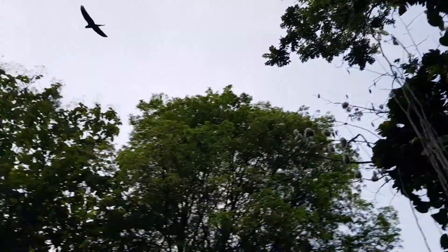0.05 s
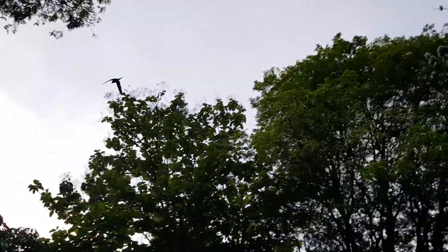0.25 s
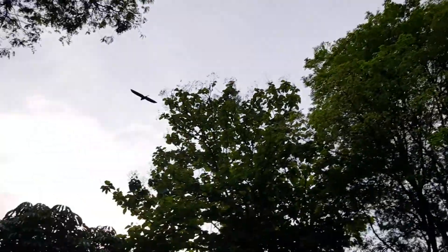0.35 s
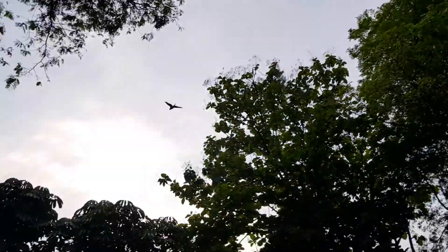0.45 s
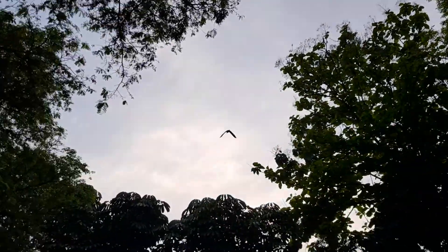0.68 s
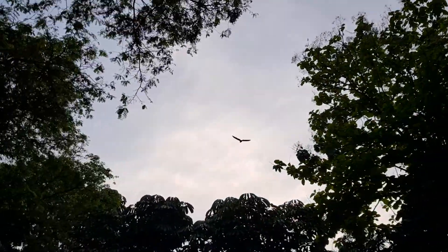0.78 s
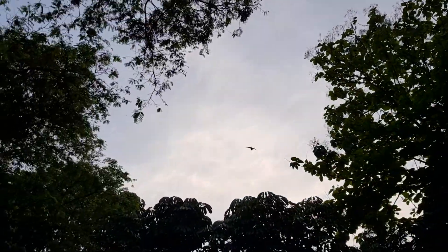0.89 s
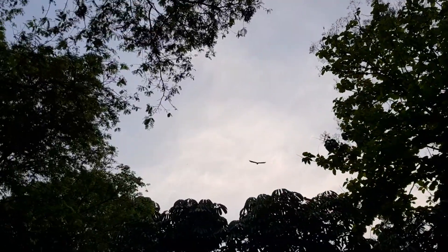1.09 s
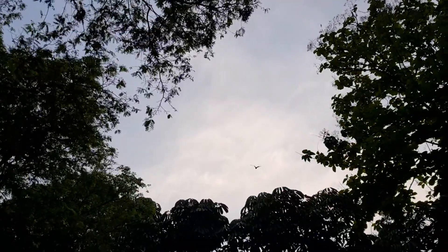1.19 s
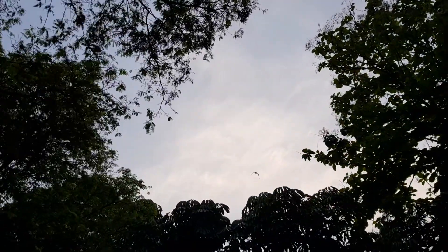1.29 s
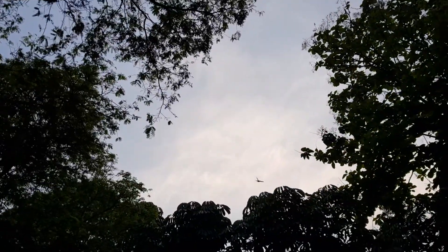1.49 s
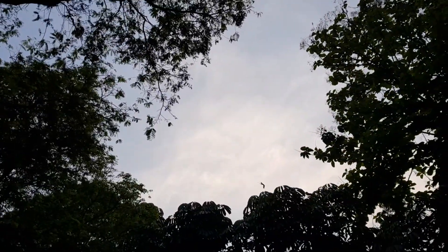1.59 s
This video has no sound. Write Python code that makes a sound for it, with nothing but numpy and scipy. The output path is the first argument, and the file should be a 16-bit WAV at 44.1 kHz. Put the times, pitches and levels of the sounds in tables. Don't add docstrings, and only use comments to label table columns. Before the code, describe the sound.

A parrot's single harsh squawk starts at 0.2 s, leaps up to around 1100 Hz, rattles with a fast flutter, and drops off by 0.54 s. Trees return a dull, diffuse echo that fades over the following second. Underneath are quiet low rumble, wavering machine hum, a high cicada buzz at left and gusty leaf hiss, strongest near 1 s. Small twig ticks at 1.39 and 1.51 s accompany faint distant chirps.

```python
import sys
import numpy as np
from scipy import signal
from scipy.fft import rfft, irfft
from scipy.io import wavfile
from scipy.ndimage import uniform_filter1d

SR = 44100
rng = np.random.default_rng(int(sys.argv[2]) if len(sys.argv) > 2 else 0)


def makeup_ratio(level_db):
    decades = np.asarray(level_db, float) / 20
    return 10 ** decades


def transcribe(u):
    v = np.clip(np.atleast_2d(u).T, -1, 1)
    q = np.round(v * 32767).astype(np.int16)
    wavfile.write(sys.argv[1], SR, q)


N = 72765
TIME_S = np.arange(N) / SR


def rms_one(x):
    return x / np.sqrt(np.mean(x ** 2) + 1e-20)


def in_time(rows):
    s, *columns = np.transpose(rows)
    return [np.interp(TIME_S, s, c) for c in columns]


def at_hz(points, hz):
    f, value = np.array(points).T
    return np.interp(np.log(np.maximum(hz, 1)), np.log(f), value)


def colour(x, points):
    return irfft(rfft(x) * makeup_ratio(at_hz(points, np.fft.rfftfreq(N, 1 / SR))), N)


def drift(rate):
    r = np.exp(-2 * np.pi * rate / SR)
    return rms_one(signal.lfilter([1], [1, -2 * r, r * r], rng.standard_normal(2 * N))[N:])


def gate(start, end, edge):
    return np.clip(np.minimum(TIME_S - start, end - TIME_S) / edge + .5, 0, 1)


def resonate(x, hz, width_hz):
    r = np.exp(-np.pi * width_hz / SR)
    return signal.lfilter([(1 - r * r) / 2, 0, (r * r - 1) / 2],
                          [1, -2 * r * np.cos(2 * np.pi * hz / SR), r * r], x)


def town():
    # f/Hz, level/dB per Hz
    rumble_spectrum = [(60, -1.5), (120, -3), (450, -13.5), (900, -25), (3100, -29.5), (4200, -29),
                       (9000, -40), (15500, -54)]
    # f/Hz, likeness (-1 to 1)
    likeness = [(60, 1), (240, 0.83), (950, -0.1), (3770, -0.33), (15000, 1)]
    rumble_db = -48
    hz = np.fft.rfftfreq(N, 1 / SR)
    alike = np.clip(at_hz(likeness, hz), -1, 1)
    mid, side = rfft(rng.standard_normal((2, N)))
    both = np.sqrt(1 + alike) * mid + np.sqrt(1 - alike) * side * [[1], [-1]]
    low_cut = np.clip(hz / 45, 0, 1) ** 4
    rumble = rms_one(irfft(both * makeup_ratio(at_hz(rumble_spectrum, hz)) * low_cut, N))
    return (makeup_ratio(rumble_db) * rumble + machine_hum()) * makeup_ratio([[.6], [-.6]])


def machine_hum():
    # f/Hz, level/dB rms, waver/dB, waver rate/Hz
    hum_lines = [
        (51, -49, 1.0, 5),
        (102, -50.5, 2.0, 6),
    ]
    # t/s, level/dB
    load = [(0, -11.5), (.3, -7), (.45, -20), (.6, 5), (.72, -16.5), (.82, 7), (.95, -14), (1.05, -9.5),
            (1.2, 2), (1.45, 2.5), (1.65, -4)]
    load_db, = in_time(load)
    hum = 0
    for k, (f, db, waver_db, rate) in enumerate(hum_lines):
        level_db = db + 3.5 + waver_db * drift(rate) + k * load_db
        phase = 2 * np.pi * np.cumsum(f + 1.24 * drift(rate)) / SR
        hum = hum + makeup_ratio(level_db) * np.sin(phase)
    return hum


def cicada():
    # t/s, level/dB
    buzz_level = [
        (0, -59.5),
        (.5, -52.5),
        (.7, -55.5),
        (1.65, -56),
    ]
    ring_hz, ring_width_hz, pan_db = 8540, 930, 7.5
    tymbal_hz, throb_depth = 91, .48
    throb = 1 + throb_depth * np.cos(2 * np.pi * np.cumsum(tymbal_hz + 0.86 * drift(6.13)) / SR)
    noise = rng.standard_normal((2, N)) * throb
    buzz = resonate(resonate(noise, ring_hz, ring_width_hz), ring_hz, ring_width_hz)
    return rms_one(buzz) * makeup_ratio(in_time(buzz_level)[0]) * makeup_ratio([[0], [-pan_db]])


def leaves():
    # t/s, level/dB
    gusts = [(0, -61), (.1, -52.5), (.2, -54), (.6, -54.5), (.72, -63), (.78, -54.5), (.84, -56),
             (.95, -48.5), (1.03, -49.5), (1.15, -56), (1.26, -74), (1.35, -56.5), (1.46, -65), (1.55, -68),
             (1.65, -108)]
    # f/Hz, level/dB per Hz
    hiss_spectrum = [(2500, -22), (5000, -20.5), (7500, -23), (10500, -18.5), (15500, -15.5)]
    right_db = -12
    grains = rng.standard_normal((2, N)) * makeup_ratio(0.85 * drift(210))
    return rms_one(colour(grains, hiss_spectrum)) * makeup_ratio(in_time(gusts)[0]) * makeup_ratio([[0], [right_db]])


def far_birds():
    # t/s, length/s, f/Hz, bandwidth/Hz, level/dB
    calls = [
        (0.088, 0.041, 5370, 485, -58),
        (1.42, 0.13, 2266, 60, -66.5),
        (1.517, 0.054, 4450, 250, -64),
        (1.5, 0.095, 5200, 648, -66.5),
    ]
    out = np.zeros((2, N))
    for s, length, hz, width_hz, db in calls:
        blur = resonate(resonate(rng.standard_normal((2, N)), hz, width_hz), hz, width_hz)
        out = out + makeup_ratio(db) * rms_one(blur) * gate(s, s + length, .02)
    return out


def ear_drifts():
    return np.array([drift(18), drift(18)])


def squawk():
    # t/s, resting pitch f/Hz, level/dB
    voice = [
        (0.21, 552, -45.5),
        (0.228, 836.2, -32),
        (0.257, 1118, -26.5),
        (0.303, 1048, -26.5),
        (0.338, 1108, -24.5),
        (.362, 1008, -24),
        (0.449, 986, -26.5),
        (0.512, 899.6, -29.5),
        (0.54, 752.8, -37),
    ]
    # start t/s, end t/s, beat f/Hz, pitch swing f/Hz
    flutters = [
        (.312, .354, 146, 110),
        (.371, .488, 144, 112),
    ]
    # f/Hz, level/dB
    throat = [(1000, -11.5), (1600, -4), (2400, 1.5), (2800, -7.5), (3300, -2.5), (4700, 0.5), (7200, -25),
              (8800, -49)]
    # f/Hz, level/dB per Hz
    breath = [(900, -47), (2400, 18.5), (3700, -25), (4700, 6), (7000, 0.5), (8200, -9), (11500, -8.5),
              (15500, -13.5)]

    rest_hz, level_db = in_time(voice)
    rest_hz = uniform_filter1d(rest_hz, int(.008 * SR))
    start_s, end_s = voice[0][0], voice[-1][0]
    unsettled = np.exp(-np.abs(TIME_S - start_s) / .022)
    brighten_db = 22 * (TIME_S - .37)

    on = [gate(a, b, .011) for a, b, _, _ in flutters]
    flutter = sum(on)
    swing_hz = sum(g * row[3] for g, row in zip(on, flutters))
    beat_hz = np.where(on[0] > 0, flutters[0][2], flutters[1][2]) + 3 * drift(27)
    beat = 2 * np.pi * np.cumsum(beat_hz) / SR
    kick_sharpness = 1.3
    kick = np.exp(kick_sharpness * np.cos(beat)) / np.i0(kick_sharpness) - 1
    jitter_hz = 4 + 7 * flutter + 45 * unsettled
    hz = rest_hz + flutter * beat_hz / 2 + swing_hz * kick + jitter_hz * drift(120)
    phase = 2 * np.pi * np.cumsum(hz) / SR
    right_lag_s = .0001
    ears = phase - 2 * np.pi * hz * right_lag_s * np.array([[0], [1]])

    fade_db, fade_rad = 2.0, .5
    tone = 0
    for k in range(1, 15):
        wander = min(k / 2, 1)
        tilt_db = brighten_db * np.log2(np.clip(k / 3, 1, 2)) * 2
        partial_db = fade_db * wander * ear_drifts() + tilt_db
        partial_phase = k * ears + k * k + fade_rad * wander * ear_drifts()
        tone = tone + makeup_ratio(partial_db) * np.sin(partial_phase)

    pulse = 1 + .4 * flutter * np.cos(beat - 2.6)
    shape = makeup_ratio(level_db) * gate(start_s, end_s, .004) * pulse
    breath_db = -25 + 2 * flutter + 9 * unsettled
    air = rng.standard_normal((2, N)) * (1 + .5 * np.sin(phase)) * makeup_ratio(breath_db)
    bird_pan_db, breath_pan_db = -1.5, 7.5
    sung = colour(shape * tone, throat) * makeup_ratio([[bird_pan_db / 2], [-bird_pan_db / 2]])
    rasp = colour(shape * air, breath) * makeup_ratio([[11.5 + breath_pan_db / 2], [17.5 - breath_pan_db / 2]])
    return sung + rasp


def trees(x):
    # f/Hz, t60/s
    decay = [(700, 0.31), (1200, 0.46), (2000, 0.47), (4500, 0.23), (7000, 0.38), (14000, 0.6)]
    # delay t/s, level over the scatter/dB, spread/s
    tree_walls = [
        (.11, 0, .012),
        (.21, 2, .012),
        (.45, 7, .07),
    ]
    # f/Hz, level/dB
    crowns = [(900, -4), (1400, -2), (2000, -3), (2600, 0), (3400, -5), (4300, 0), (5600, -2), (12000, -6)]
    trees_db, far_db, far_stretch, build_s = -5, -13, 2.6, .03
    walls = 1
    for s, db, spread_s in tree_walls:
        walls = walls + makeup_ratio(db) * np.exp(-.5 * ((TIME_S - s) / spread_s) ** 2)
    white = rng.standard_normal((2, 2, N))
    half_octaves_hz = 500 * 2 ** np.arange(0, 5.1, .5)
    scatter = 0
    for k, (low, high) in enumerate(zip(half_octaves_hz, half_octaves_hz[1:])):
        t60 = at_hz(decay, np.sqrt(low * high))
        band_filter = signal.butter(2, [low, high], "band", fs=SR, output="sos")
        band = signal.sosfilt(band_filter, white[k % 2])
        near = makeup_ratio(-60 * TIME_S / t60)
        far = makeup_ratio(far_db - 60 * TIME_S / (t60 * far_stretch))
        scatter = scatter + band * (near + far)
    echo = scatter * walls * np.clip(TIME_S / build_s, 0, 1)
    echo = makeup_ratio(trees_db) * echo / np.sqrt(np.sum(echo ** 2) / 2)
    return signal.fftconvolve(colour(x, crowns)[None], echo, axes=1)[:, :N]


def twig_ticks():
    # t/s, peak level/dB
    ticks = [
        (1.3858, -42),
        (1.5124, -49.5),
    ]
    # f/Hz, level/dB, t60/s
    modes = [
        (1605, -9, 0.015),
        (1850, -2.5, 0.0099),
        (2833, -18, 0.038),
    ]
    click = np.eye(1, 2000)[0]
    tick = 0
    for hz, db, t60 in modes:
        contact = resonate(click, hz, 420)
        tick = tick + makeup_ratio(db) * rms_one(resonate(contact, hz, 1.76 / t60))
    tick = tick / np.abs(tick).max()
    out = np.zeros((2, N + 2000))
    for s, db in ticks:
        start = int(s * SR)
        out[:, start:start + len(tick)] += makeup_ratio(db + 3) * tick
    return out[:, :N]


def scene():
    bird = squawk()
    surroundings = town() + cicada() + leaves() + far_birds() + twig_ticks()
    return bird + trees(bird[1]) + surroundings


def low_pass(x):
    return signal.sosfilt(signal.butter(12, 15710, fs=SR, output="sos"), x)


def record(dry):
    fade_out = np.clip(np.arange(N)[::-1] / (.003 * SR), 0, 1)
    return low_pass(dry * fade_out)


dry = scene()
out = record(dry)
transcribe(out)
```